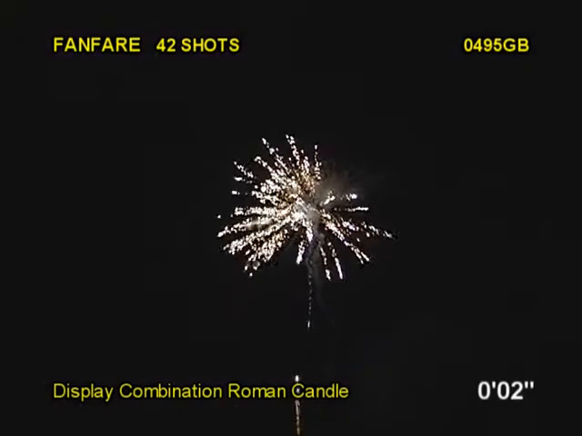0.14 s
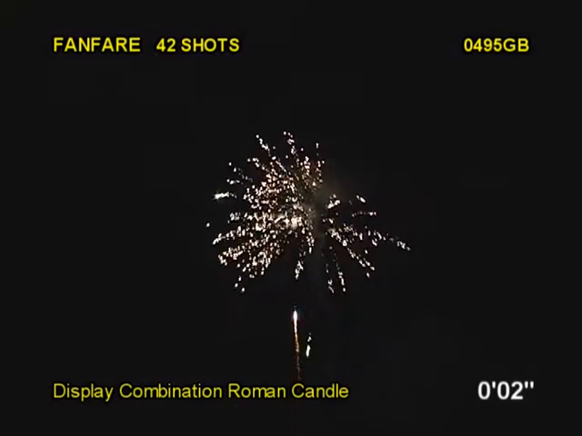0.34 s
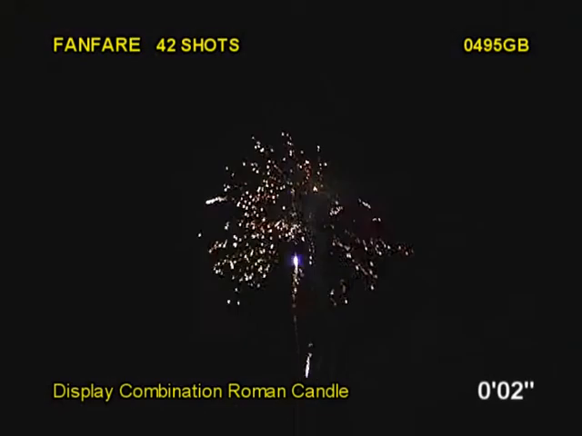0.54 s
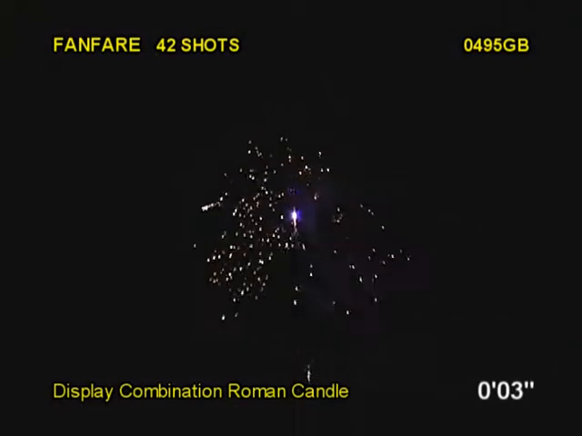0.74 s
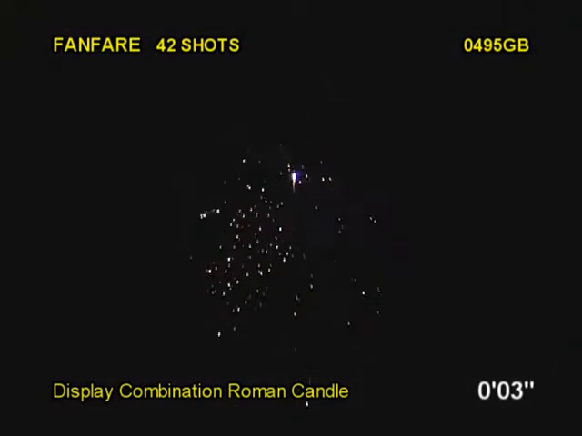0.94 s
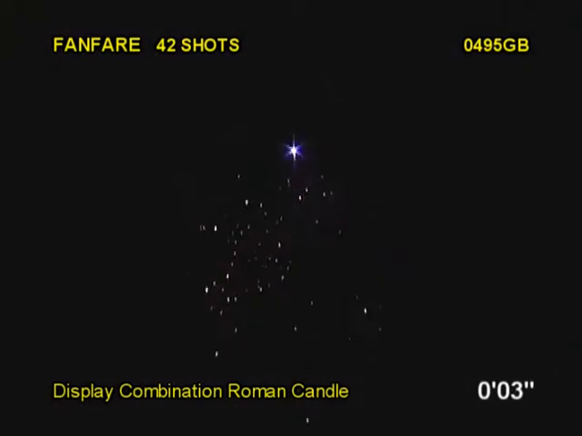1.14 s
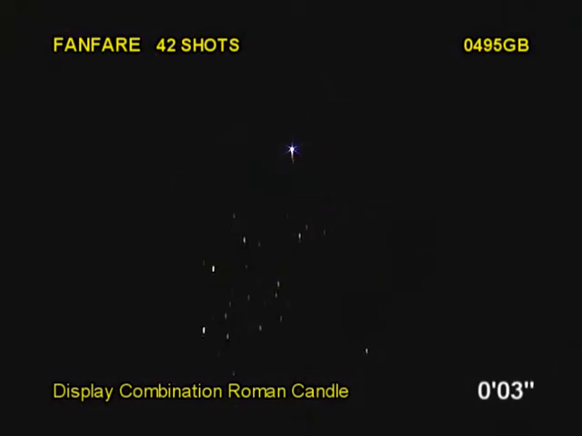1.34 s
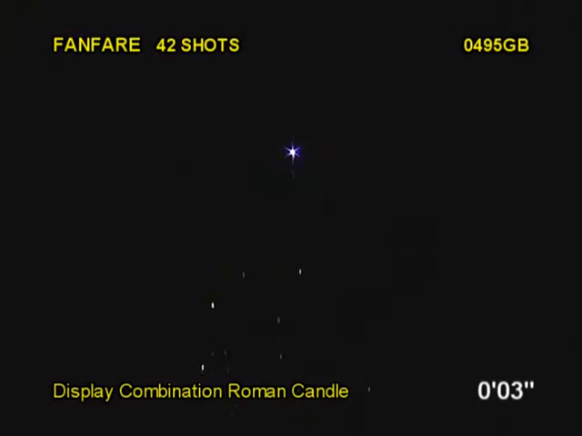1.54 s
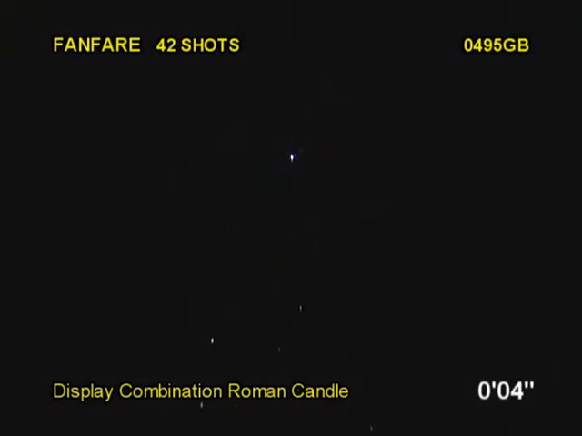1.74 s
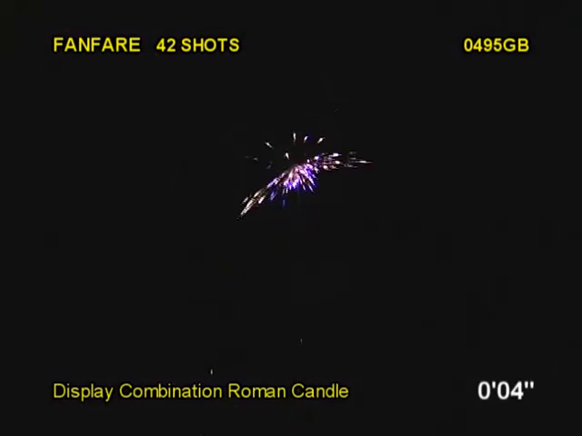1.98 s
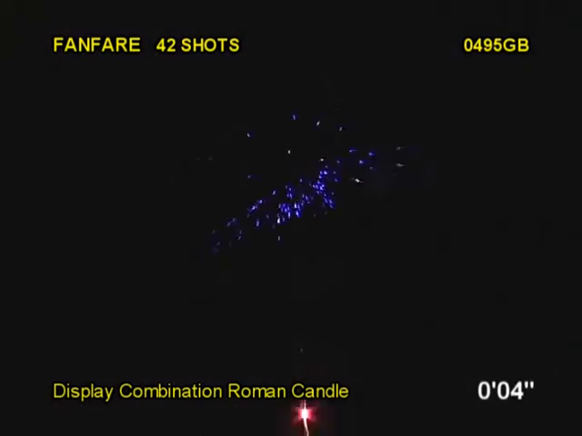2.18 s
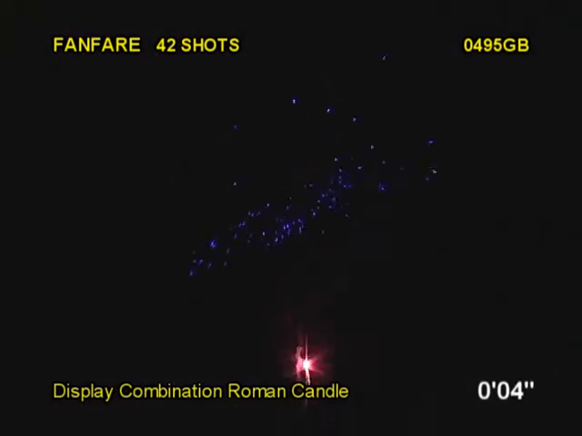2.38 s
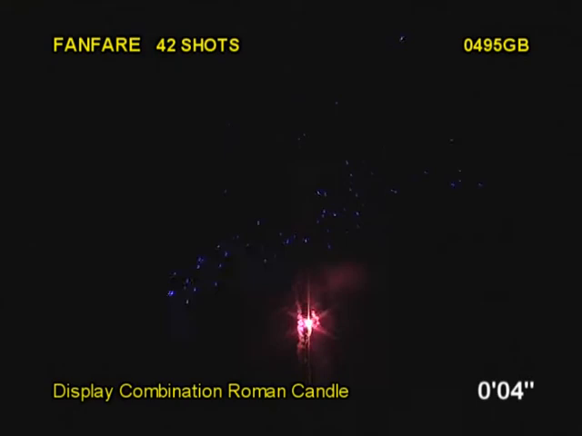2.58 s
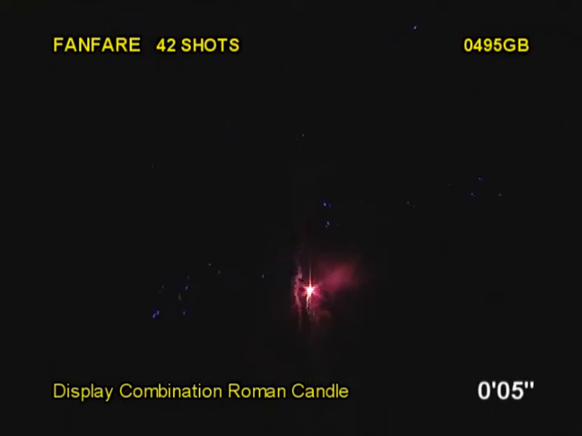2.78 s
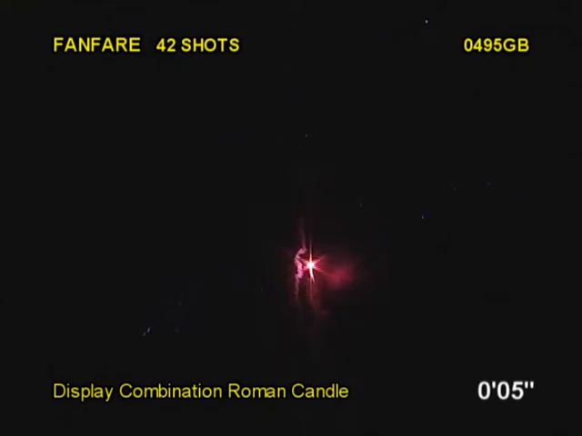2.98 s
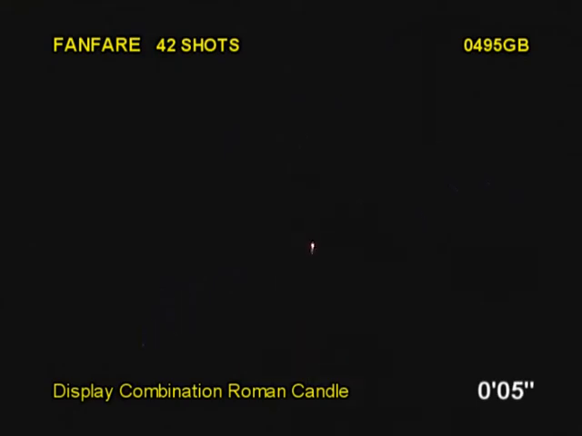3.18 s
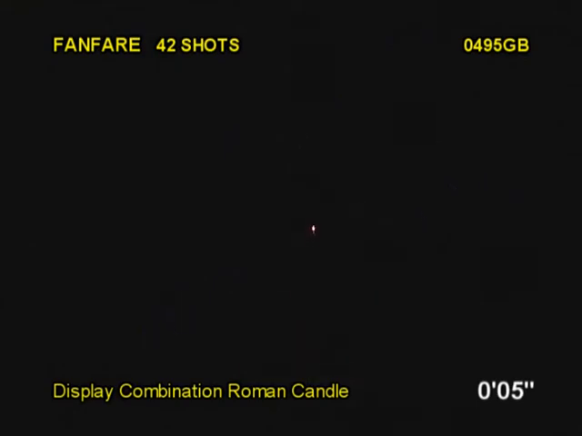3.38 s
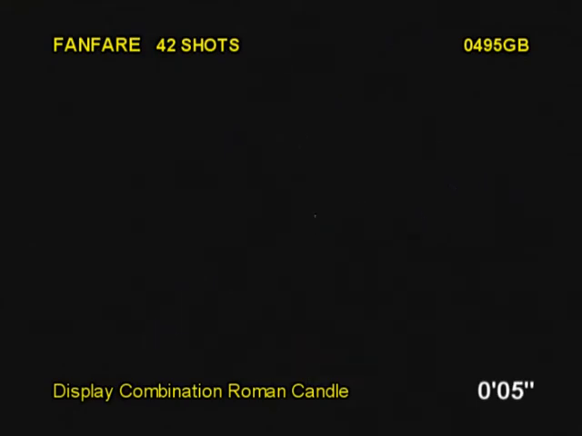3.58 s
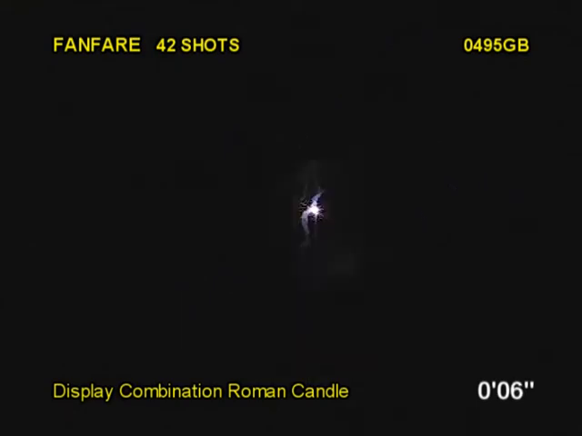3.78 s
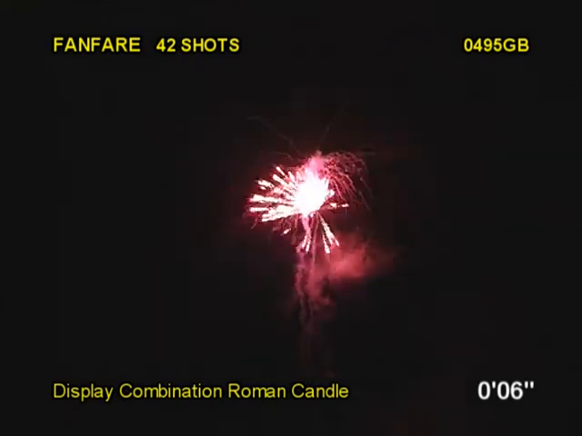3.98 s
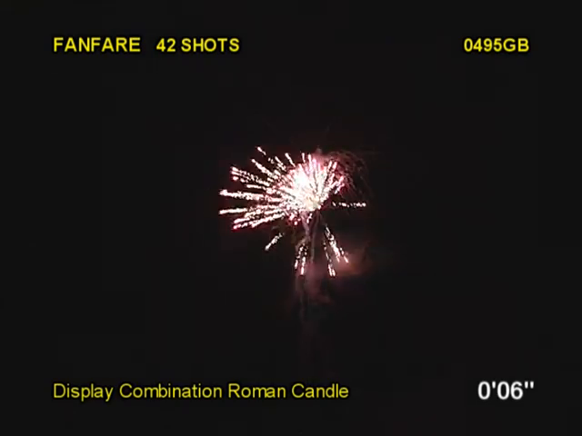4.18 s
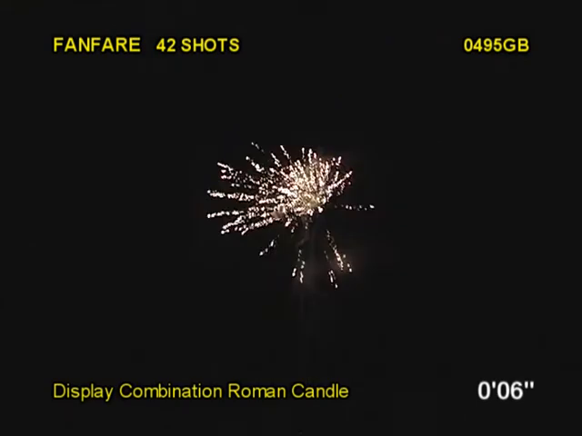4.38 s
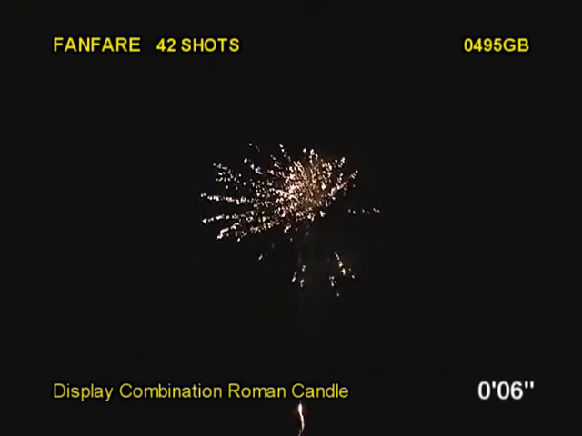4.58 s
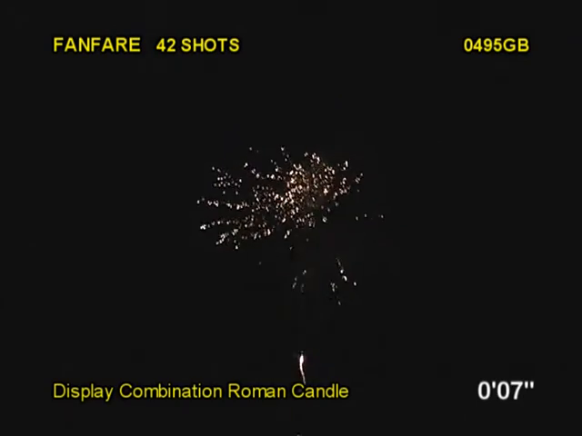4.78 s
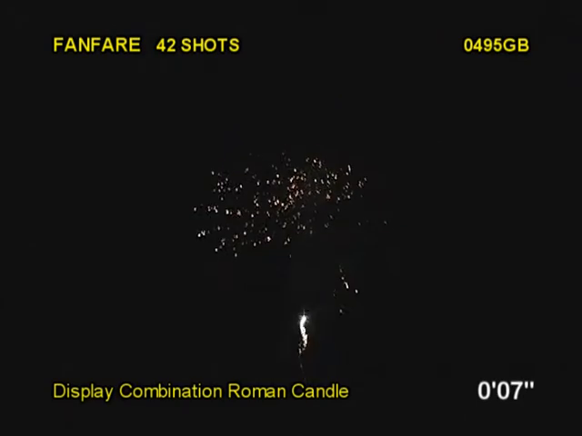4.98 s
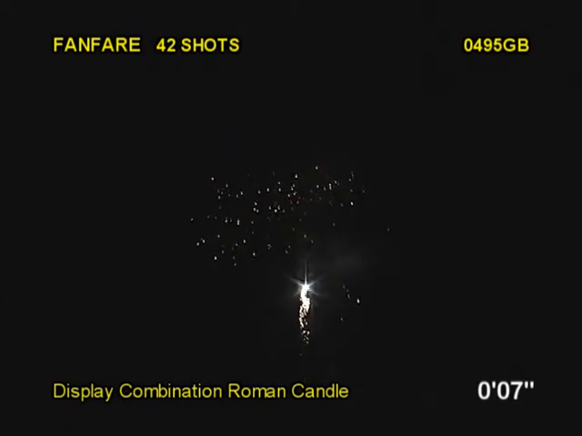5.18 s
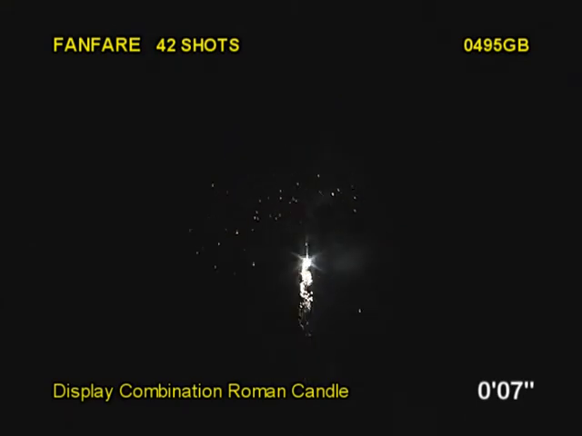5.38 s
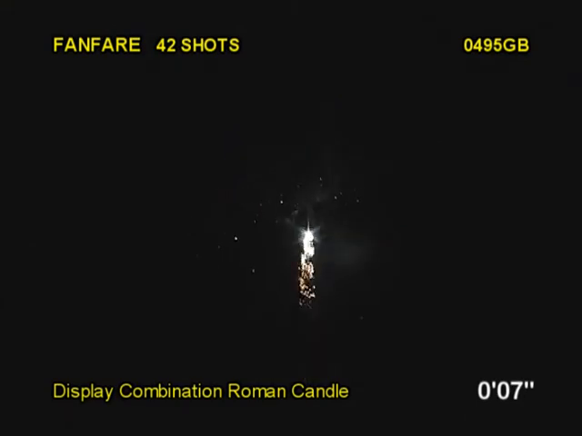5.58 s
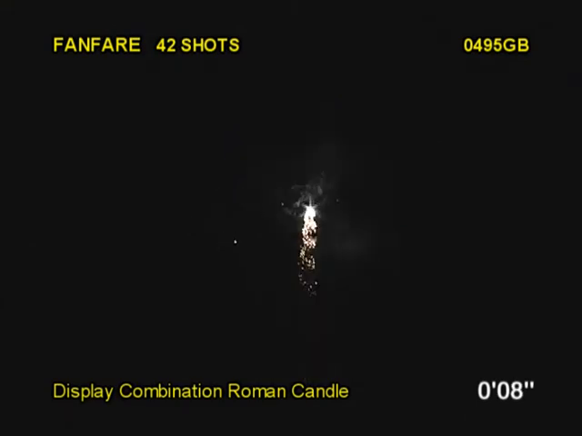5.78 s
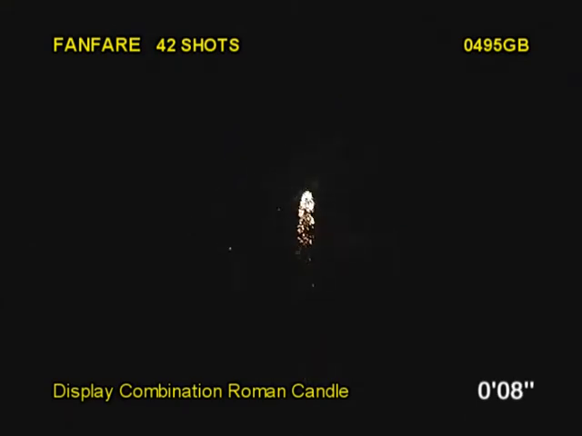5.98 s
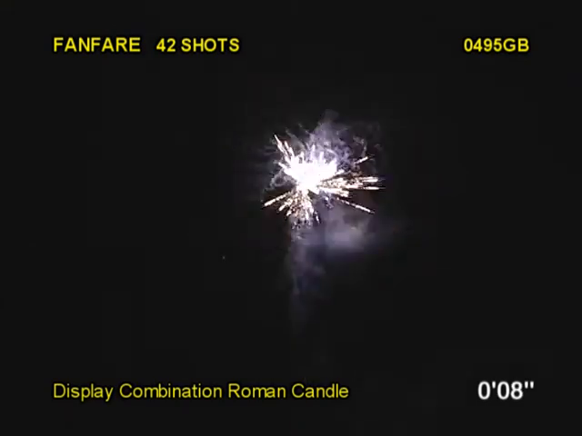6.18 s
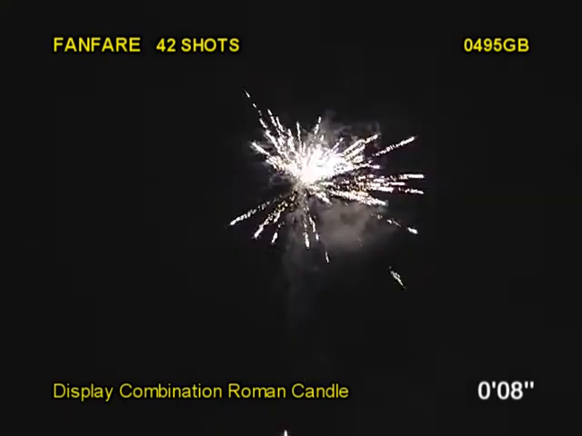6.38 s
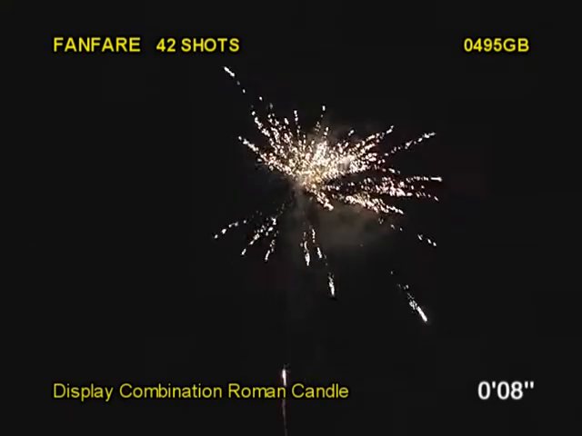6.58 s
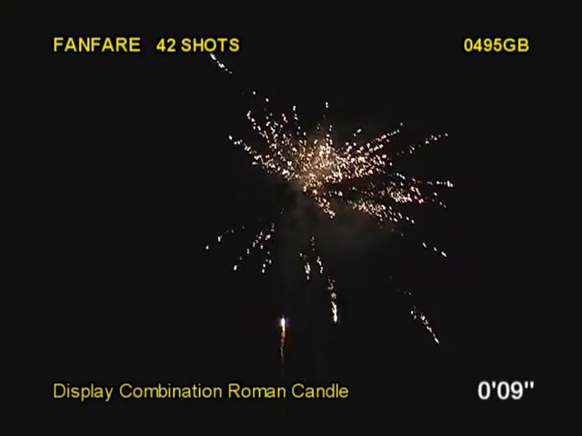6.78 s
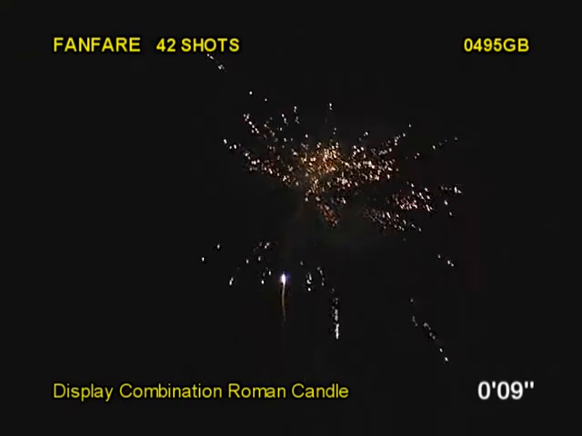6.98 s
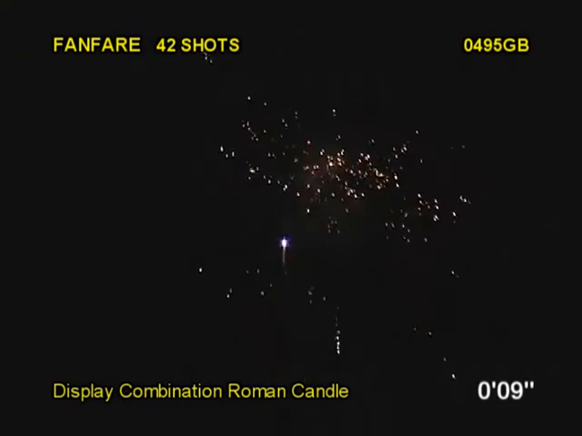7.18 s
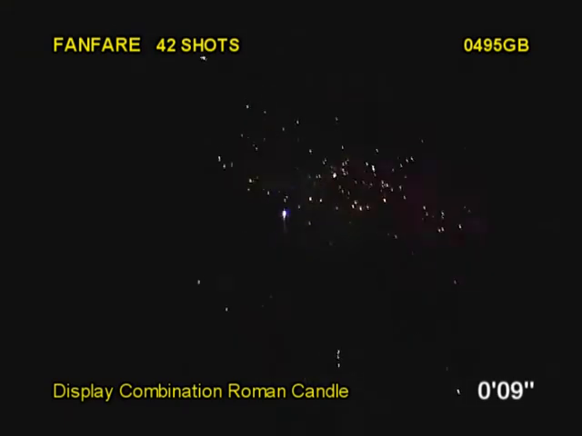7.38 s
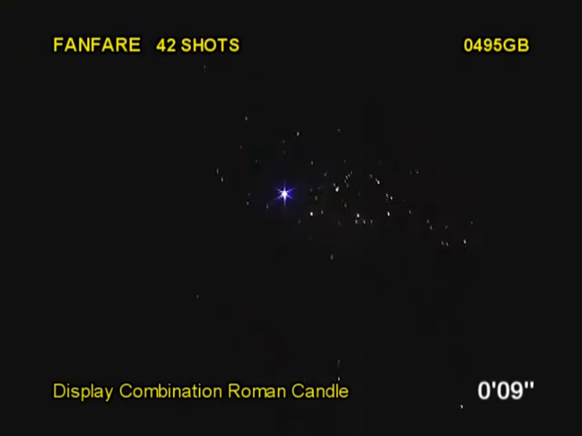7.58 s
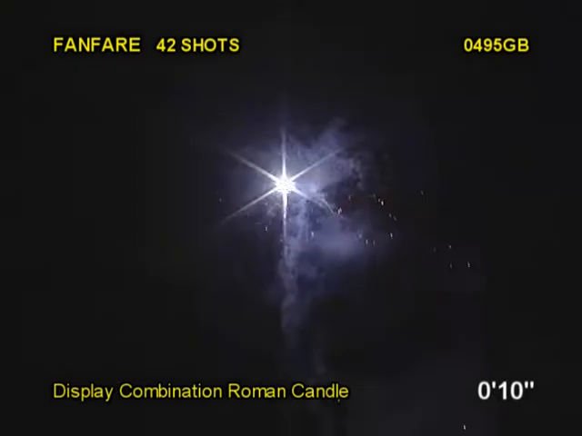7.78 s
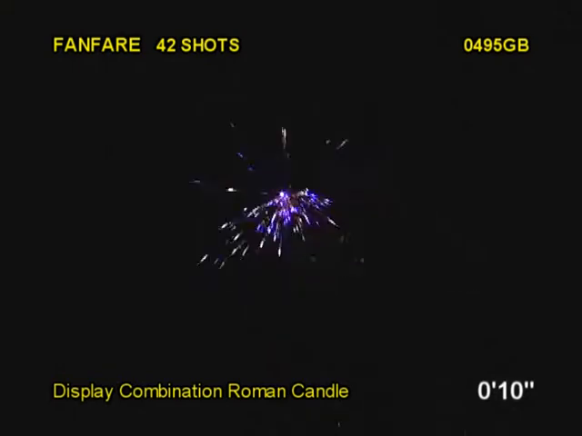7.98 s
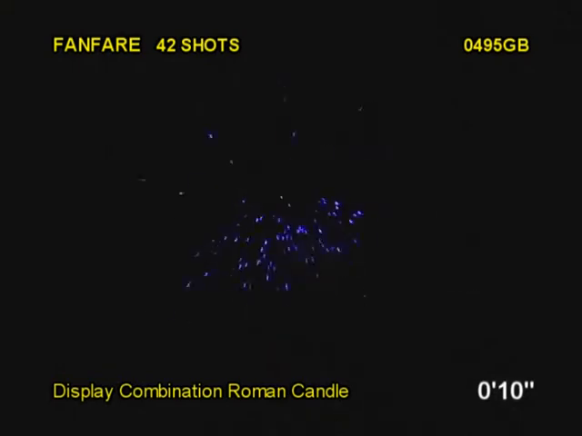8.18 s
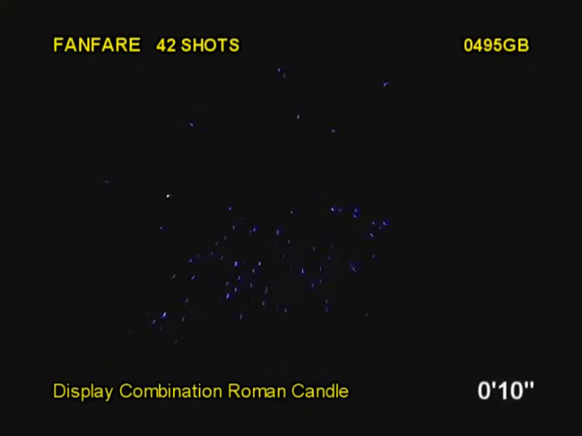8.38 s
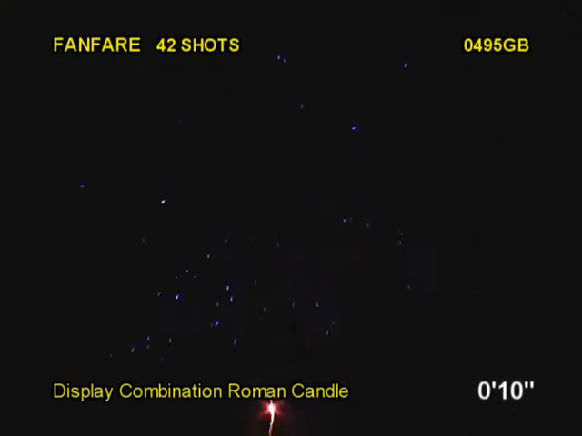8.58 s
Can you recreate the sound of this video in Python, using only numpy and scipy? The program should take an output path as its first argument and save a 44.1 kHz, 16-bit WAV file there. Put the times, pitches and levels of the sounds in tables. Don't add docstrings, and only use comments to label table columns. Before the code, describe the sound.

A quiet field at night, with low distant traffic and air, and a thin trembling insect band near 6 kHz, clear on the right. At 0 s a burst and tube thump are already sounding, their echoes and rumble dying away. A hollow lift thump with a small muzzle crack and sputtering hiss comes at 1.7 s, then a hard bang at 2.1 s, just after a very faint one. Another bang, somewhat weaker, lands at 4.1 s, almost overlapped by the loudest lift at 4.2 s. A thump at 6.1 s leads to a strong bang at 6.4 s; a soft thump at 8.0 s precedes the strongest at 8.1 s. The right microphone hears everything about 0.1 s later. Each bang clips abruptly, scatters into separate slaps within half a second, with weak late returns beyond one second, and leaves grainy rumble losing treble until the night returns.

```python
import sys
import numpy as np
from scipy import signal
from scipy.fft import rfft, irfft, next_fast_len
from scipy.io import wavfile
from scipy.ndimage import uniform_filter1d

SR = 44100
rng = np.random.default_rng(int(sys.argv[2]) if len(sys.argv) > 2 else 0)


def to_wav(s):
    ch = np.atleast_2d(s).T
    pcm = np.round(np.clip(ch, -1, 1) * 32767)
    wavfile.write(sys.argv[1], SR, pcm.astype(np.int16))


def boost(x):
    u = np.asarray(x, float) / 20
    return 10 ** u


N = 381465

# left t/s, right t/s, stretch of the echo delays with height [ratio]
BURSTS = [
    (-.111, -.011, 1.003),
    (2.0036, 2.1038, 1),
    (2.1068, 2.2036, 1.003),
    (4.0785, 4.1769, 1),
    (6.3534, 6.4521, 1),
    (8.078, 8.1765, 1),
]
BURST_LEVELS = [-3.97, -37, -3.44, -5.5, -2.7, -2.36]
# left t/s, level/dB
LIFTS = [
    (-.06, 7),
    (1.7319, 6),
    (4.1625, 7.5),
    (6.084, 7),
    (7.9625, 4),
]
LIFT_LEVELS = [-27.5, -21]
# lag t/ms, level/dB, push t/ms, top f/Hz, wrong-way swing t/ms
FRONTS = [
    [(0, 13, .5, 9000, 0), (1.87, 14, .55, 7500, 0), (3.6, 5, 1.0, 1500, 0)],
    [(0, 13, .7, 13000, .1), (2.15, 11, 1.7, 2500, 0), (2.7, 13, .6, 13000, .06), (5.35, 7, 2.0, 1000, 0)],
]
# f/Hz, level/dB, fall by 60 dB t/s
STAND_RINGS = [
    [(529, -11, 0.057), (646, -15, 0.048), (775, -20.5, 0.028), (1010, -22, 0.046), (195, -29, 0.04)],
    [(366, -6, 0.039), (278, -5.5, 0.06), (454, -10.5, 0.074), (675, -10.5, 0.067), (1130, -16, 0.0043)],
]
# f/Hz, level/dB, fall by 60 dB t/s
TUBE_RINGS = [(111, -8, 0.053), (175, 2.5, 0.049), (243, 9, .028), (316, -20.5, 0.042), (1067, -9.5, 0.018),
              (1380, 0.5, 0.012), (3990, -9, .006)]
CEILING = [0.51, 0.49]
# delay t/s, level/dB, top f/Hz
LEFT_ECHOES = [(.066, -26, 6060), (.084, -59, 4000), (.096, -38.5, 873), (.178, -33, 2020),
               (.203, -14, 2010), (.237, -30, 1800), (.34, -32, 1200), (.425, -35, 1000),
               (.693, -29.5, 800), (.824, -34, 800), (1.273, -47.5, 900), (1.473, -44, 900)]
RIGHT_ECHOES = [(.029, -23, 7000), (.047, -21, 4000), (.059, -20, 7000), (.073, -17, 900),
                (.0845, -9, 3500), (.094, -13, 600), (.1165, -7, 2200), (.133, -16, 6000), (.161, -11, 800),
                (.193, -20, 2000), (.213, -14, 900), (.223, -16, 1500), (.245, -22, 1800),
                (.322, -24, 1500), (.36, -22, 2500), (.508, -27, 4000), (.596, -31, 4000), (.618, -27, 900),
                (1.158, -29.5, 750), (1.358, -34, 1200)]
# delay t/s, level/dB, top f/Hz
LIFT_ECHOES = [
    [(.014, -15, 6000), (.068, -20, 4960), (.115, -16, 1500), (.183, -14, 2500), (.213, -13.5, 2500)],
    [(.014, -29, 5900), (.082, -4.5, 2550), (.166, -10.5, 1200), (.227, -12, 3000)],
]
# first return t/s, swell t/s, level/dB
# near 600 Hz, fade/dB per s, level/dB near 3500 Hz against that at 600 Hz
CROWDS = [
    [(0, 0, -24, 1100, -5.5), (.012, 0.0032, -45.5, 60, -9.5), (.058, 0.027, -37, 202, -9.5),
     (.15, 0.019, -39.5, 124, -5.5), (.15, .05, -43, 23, -5)],
    [(0, 0, -18, 1300.5, 0.5), (.012, .005, -34, 21, -6.5), (.066, 0.0047, -29, 128, -2.5),
     (.075, 0.067, -31.5, 22, -6)],
]
# f/Hz, level/dB
RUMBLE_COLOUR = [
    [(40, -2.5), (90, -19), (200, 2), (350, -3), (700, -2.5), (1600, 2.5), (3500, -2), (6300, -2),
     (10000, -25), (15000, -52)],
    [(40, -35.5), (90, -18), (200, -2.5), (350, -7.5), (700, -1), (1600, -3), (2900, -4), (4200, -11),
     (6300, -1.5), (10000, -14.5), (15000, -8.5)],
]
# level/dB, bass and treble
LIFT_RUMBLE_LEVELS = (-28.5, -26.5)
# f/Hz, level/dB per Hz
NIGHT_AIR = [
    [(30, -94), (70, -83.5), (220, -86.5), (500, -102), (1000, -108), (2000, -113), (3500, -125),
     (5000, -122), (6800, -120), (9000, -125), (13000, -132)],
    [(30, -81), (55, -71.5), (150, -86.5), (250, -84.5), (500, -90.5), (1000, -89.5), (2000, -102),
     (3700, -113), (5000, -116), (9000, -115), (13000, -117)],
]
# centre f/Hz, width f/Hz, level/dB
INSECTS = [
    (6700, 1700, -102.5),
    (6240, 1630, -69),
]
# f/Hz, level/dB
MICROPHONE = [(300, -1), (3800, -3.5), (6500, 0), (10000, -0.5), (12500, -0.5), (15000, -11.5),
              (22050, -45)]

LIFT_LAG_S = .1063


def burst(track, side, s, db, stretch):
    for lag_ms, front_db, push_ms, top_hz, flip_ms in FRONTS[side]:
        front = shock(push_ms, pull=1.15 if top_hz > 5000 else .7)
        front[:int(flip_ms * SR / 1000)] *= -1
        add(track, s + lag_ms / 1000, boost(db + front_db) * dull(front, top_hz))

    modes = [(hz * (1 + .025 * rng.standard_normal()), ring_db, t60)
             for hz, ring_db, t60 in STAND_RINGS[side]]
    add(track, s, boost(db) * ring(modes, np.cos))

    for delay, echo_db, top_hz in (LEFT_ECHOES, RIGHT_ECHOES)[side]:
        echo = burst_echo(delay, top_hz)
        gain = boost(db + echo_db + 3.5 + .8 * rng.standard_normal())
        add(track, s + delay * stretch, echo * gain / np.abs(echo).max())


def burst_echo(delay, top_hz):
    smear_ms = 5.5 * (1000 / top_hz) ** .5
    t = np.arange(SR // 50) / SR * 1000 / smear_ms
    facets = rng.standard_normal(len(t)) * (rng.random(len(t)) < .012) * np.exp(-t)
    facets[[0, SR // 400]] = 1.3, .7
    echo = np.convolve(facets, shock(push_ms=0.59, pull=2.38)[:SR // 60])
    echo[:len(t)] += .45 * rng.standard_normal(len(t)) * np.exp(-t)
    echo = dull(dull(echo, top_hz), 1.6 * top_hz)
    return signal.lfilter(*signal.butter(2, 210 + 70 * delay, "high", fs=SR), echo)


def shock(push_ms, pull=3.0):
    t = np.arange(SR // 25) / SR / (push_ms / 1000)
    return (1 - t) * np.exp(-t / pull)


def ring(modes, wave):
    t = np.arange(SR // 10) / SR
    return sum(boost(db) * wave(2 * np.pi * hz * t) * boost(-60 * t / t60) for hz, db, t60 in modes)


def lift(track, side, s, db):
    db = db + LIFT_LEVELS[side]
    thump = ring(TUBE_RINGS, lambda phase: np.sin(phase + 1.0))
    thump *= 1 - 0.85 * np.exp(-np.arange(len(thump)) / SR / 0.0049)
    thump[:SR // 25] += .18 * shock(push_ms=.08)
    thump = dull(thump, 5300) * boost(db)
    add(track, s, thump)
    posts(track, side, s, db)
    add(track, s, comet(side, db))
    for delay, echo_db, top_hz in LIFT_ECHOES[side]:
        add(track, s + delay, boost(echo_db) * dull(thump, top_hz))


def posts(track, side, s, db, count=6):
    first_s, step_s, loss_db = .0135, .0123, 1.2
    post_db = [-19, -21][side]
    band = signal.butter(2, [2500, 7500], "band", fs=SR)
    t = np.arange(SR // 200) / SR
    for k, (late, size) in enumerate(rng.standard_normal((count, 2))):
        tick = signal.lfilter(*band, rng.standard_normal(len(t)) * np.exp(-t / .0012))
        gain = boost(db + post_db - k * loss_db + 1.5 * size)
        add(track, s + first_s + k * step_s + .0004 * late, tick * gain)


def comet(side, db):
    level_db, t60_s = [-32, -33][side], 1.3
    t = np.arange(SR // 2) / SR
    band = signal.butter(2, [1000, 5500], "band", fs=SR)
    hiss = signal.lfilter(*band, rng.standard_normal(len(t)))
    return hiss * boost(db + level_db - 60 * t / t60_s + 3 * walk(130)[:len(t)])


def rumble(side):
    size = next_fast_len(N)
    grain_db = np.minimum(3.0 * rng.exponential(size=N), 9)
    grains = (rng.random(N) < 1500 / SR) * rng.choice([-1, 1], N) * boost(grain_db)
    scatter = rfft(boost(.8 * walk(90)) * (rng.standard_normal(N) + 2.2 * grains), size)
    octaves = np.log2(np.arange(len(scatter)) * SR / size + 1)
    scatter = scatter / (1 + (2 ** octaves / 12700) ** 60)

    shots = [(row[side], db, None) for row, db in zip(BURSTS, BURST_LEVELS)]
    shots += [(s + side * LIFT_LAG_S, db, LIFT_RUMBLE_LEVELS) for s, db in LIFTS]
    coarse = np.arange(0, N + 64, 64) / SR
    lumps_db = 2.2 * np.resize(walk(60)[::64], len(coarse))
    out = np.zeros(N)
    for hz in 45 * 2 ** np.arange(0, 8.1, .5):
        window = np.cos(np.pi / 2 * np.clip(2 * (octaves - np.log2(hz)), -1, 1))
        band = irfft(scatter * window, size)[:N]
        treble = max(np.log(hz / 600) / np.log(3500 / 600), -.25)
        colour_db = on_log(RUMBLE_COLOUR[side], hz)
        power = 0
        for s, db, lift_levels in shots:
            crowds = CROWDS[side]
            if lift_levels is not None:
                db = db + np.interp(treble, [0, 1], lift_levels)
                crowds = crowds[1:]
            level_db = db + colour_db + scattered_db(crowds, coarse - s, hz, treble)
            power = power + boost(level_db) ** 2 * (coarse > s)
        clumps = boost(max(1 - treble, .5) * lumps_db)
        out += band / band.std() * np.interp(np.arange(N) / SR, coarse, clumps * np.sqrt(power))
    return out


def scattered_db(crowds, delay, hz, treble):
    power, delay = 1e-18, np.maximum(delay, 0)
    for first_s, swell_s, db, fade_db, treble_db in crowds:
        age = np.maximum(delay - first_s, 0)
        swell = 1 - np.exp(-age / swell_s) if swell_s > 0 else 1
        power = power + (swell * boost(db + treble * treble_db - fade_db * age)) ** 2
    air_db = treble * 3.5 * (1 - np.exp(-delay / 0.93))
    air_db = air_db + 18 * (hz / 10000) ** 2 * delay
    return 10 * np.log10(power) - air_db


def night(side):
    size = next_fast_len(N)
    hz = np.arange(size // 2 + 1) * SR / size + 1
    air_shape = boost(on_log(NIGHT_AIR[side], hz)) * np.sqrt(SR / 2) * (hz < 12300)
    air = irfft(rfft(rng.standard_normal(size)) * air_shape, size)[:N]
    centre_hz, width_hz, db = INSECTS[side]
    song_shape = np.exp(-(2 * (hz - centre_hz) / width_hz) ** 2)
    song = irfft(rfft(rng.standard_normal(size)) * song_shape, size)[:N]
    return air * boost(1.2 * walk(2.5)) + song / song.std() * boost(db + 2.6 * walk(90))


def add(track, s, sound):
    start = int(round(s * SR))
    first, last = max(start, 0), min(start + len(sound), N)
    if last > first:
        track[first:last] += sound[first - start:last - start]


def dull(x, hz):
    return signal.lfilter(*signal.butter(2, min(hz, .45 * SR), fs=SR), x)


def walk(rate):
    k = int(SR / rate)
    steps = np.repeat(rng.standard_normal(N // k + 1), k)
    return 1.25 * uniform_filter1d(uniform_filter1d(steps, k), k)[:N]


def on_log(table, hz):
    points = np.array(table)
    return np.interp(np.log(hz), np.log(points[:, 0]), points[:, 1])


def scene():
    out = np.array([rumble(side) + night(side) for side in range(2)])
    for side in range(2):
        for row, db in zip(BURSTS, BURST_LEVELS):
            burst(out[side], side, row[side], db, row[2])
        for s, db in LIFTS:
            lift(out[side], side, s + side * LIFT_LAG_S, db)
    return out


def hum(x):
    lag, zero, pole = 147, .9, .67
    gap = np.zeros(lag - 1)
    kept = signal.lfilter(np.r_[1, gap, -zero], np.r_[1, gap, -pole], x)
    return x - kept * (1 + pole) / (1 + zero)


def overload(x):
    top = np.array(CEILING)[:, None]
    return x / (1 + np.abs(x / top) ** 6) ** (1 / 6)


def band_limit(x):
    return signal.sosfilt(signal.butter(12, 15450, fs=SR, output="sos"), x)


def record(dry):
    x = overload(dry)
    quiet = np.clip(x, -.08, .08)
    x = x - hum(quiet) - dull(hum(x - quiet), 1500)
    x = 0.34 * x + 0.7 * signal.lfilter(*signal.iirnotch(147, 5.5, fs=SR), x)
    x = signal.lfilter(*signal.butter(1, 60, "high", fs=SR), x)
    size = next_fast_len(N)
    hz = np.arange(size // 2 + 1) * SR / size + 1
    x = irfft(rfft(x, size) * boost(on_log(MICROPHONE, hz)), size)[:, :N]
    return band_limit(x)


dry = scene()
out = record(dry)
to_wav(out)
```